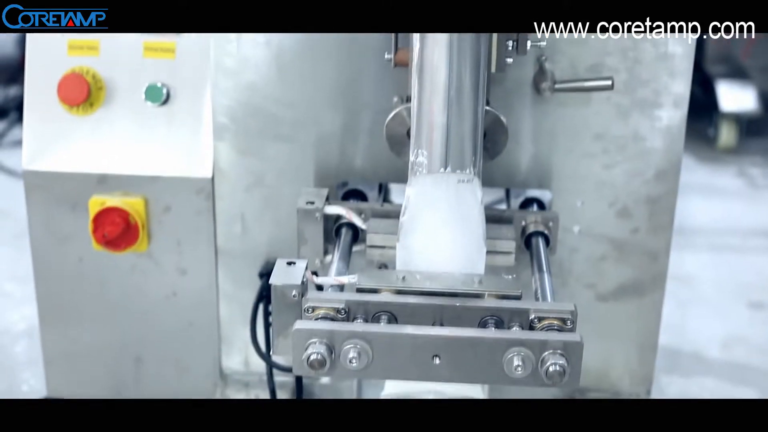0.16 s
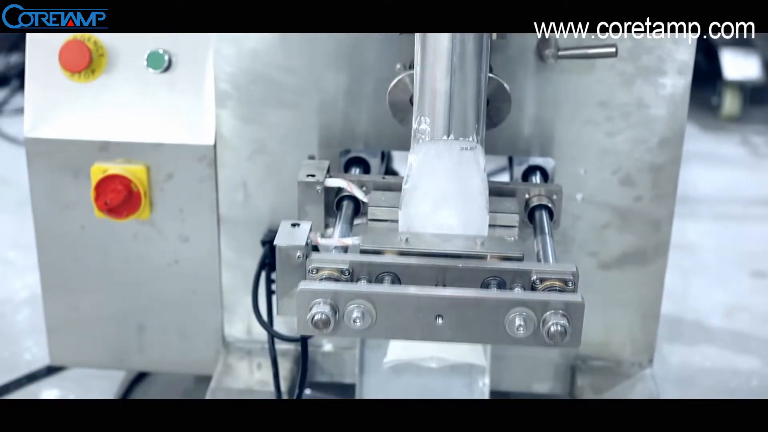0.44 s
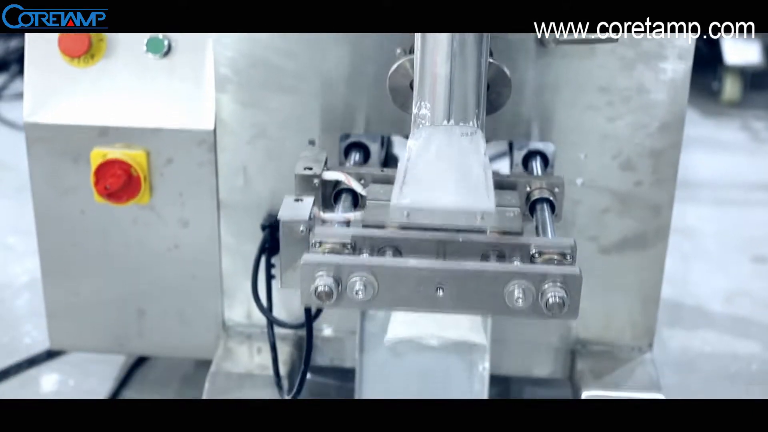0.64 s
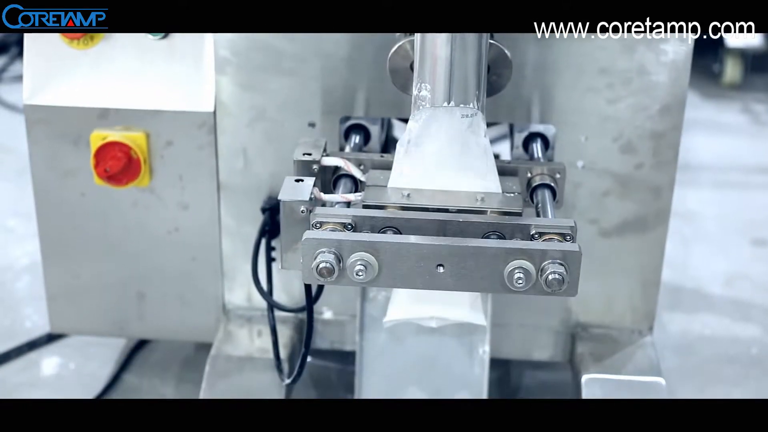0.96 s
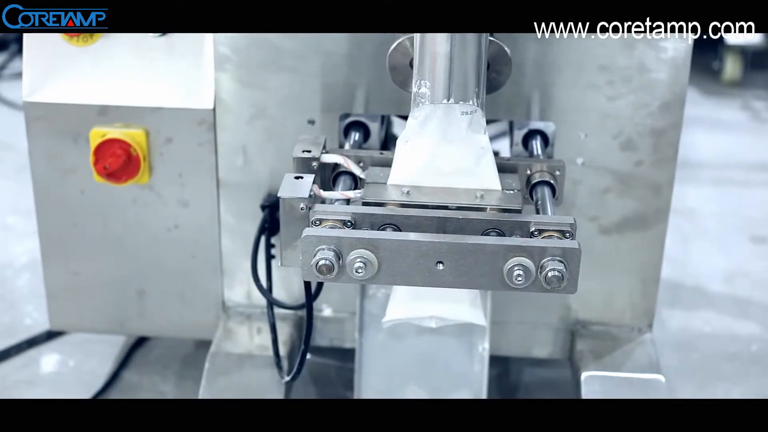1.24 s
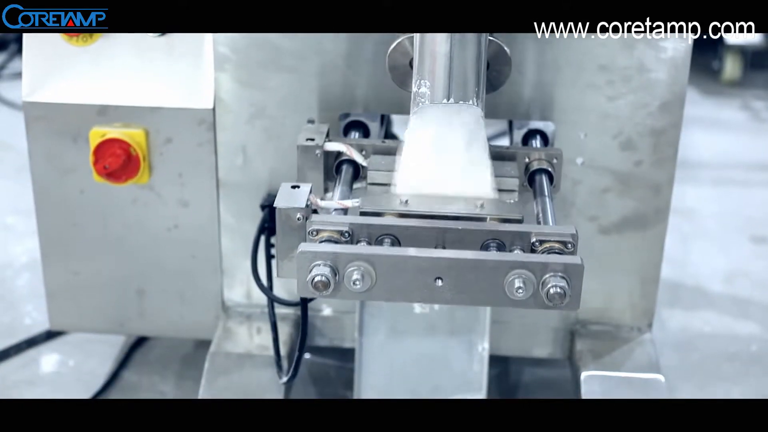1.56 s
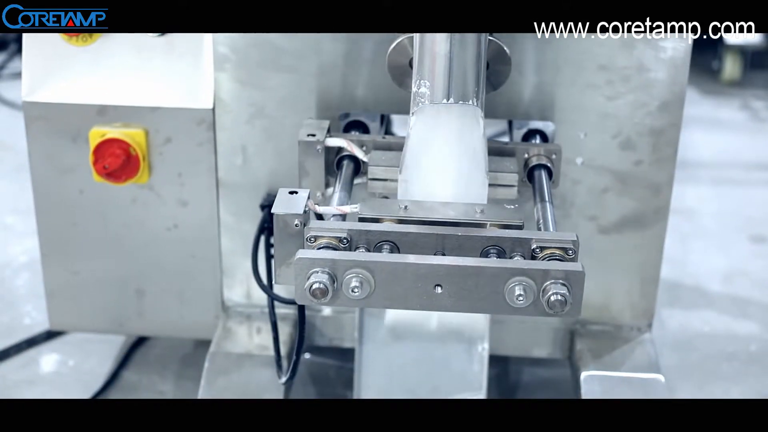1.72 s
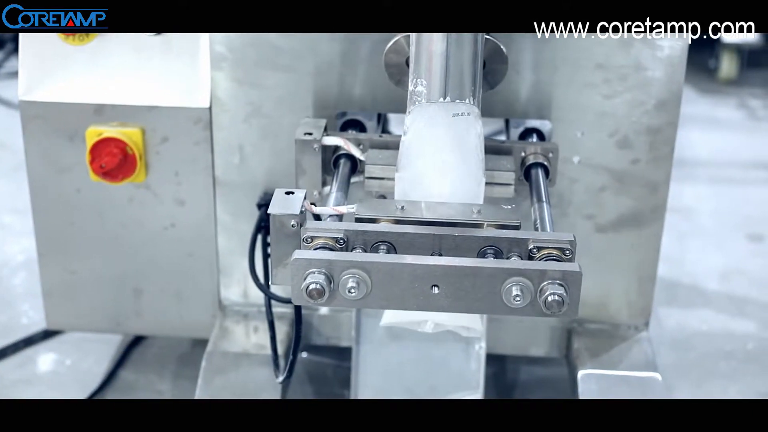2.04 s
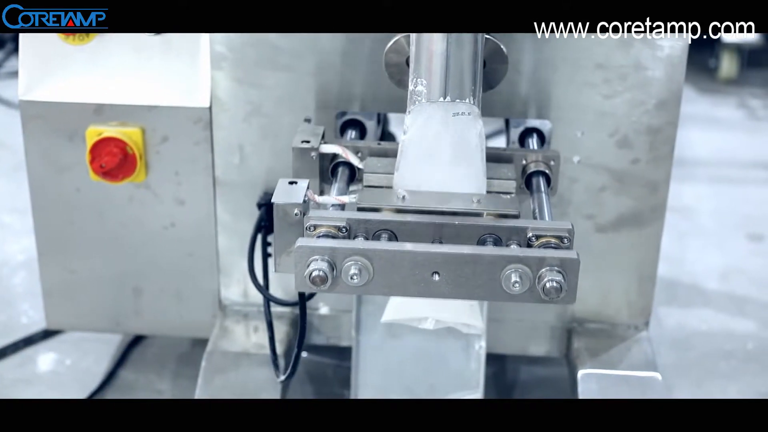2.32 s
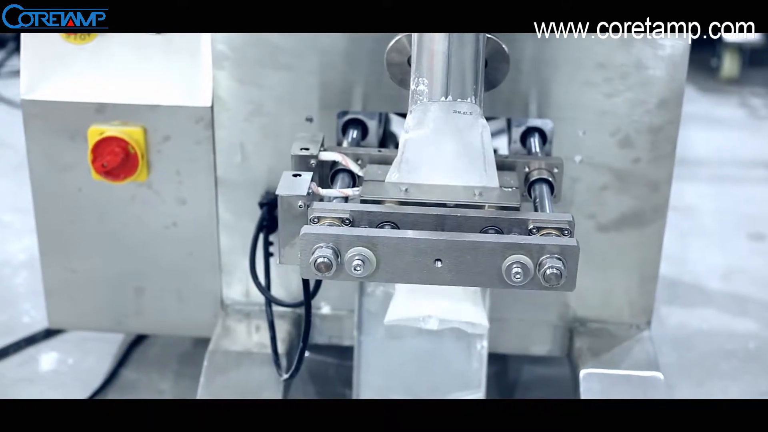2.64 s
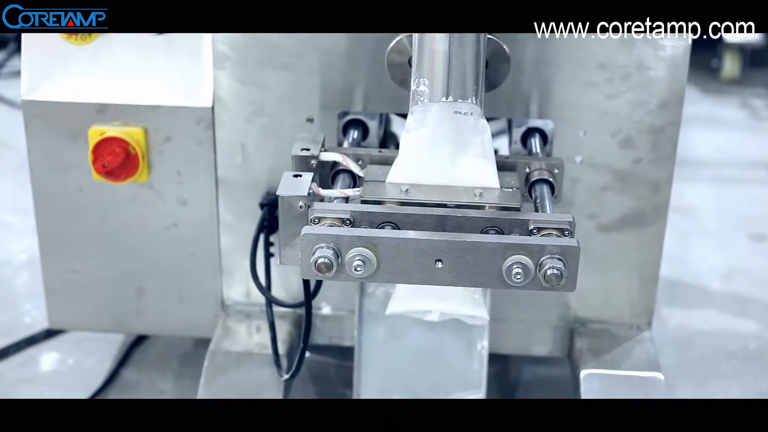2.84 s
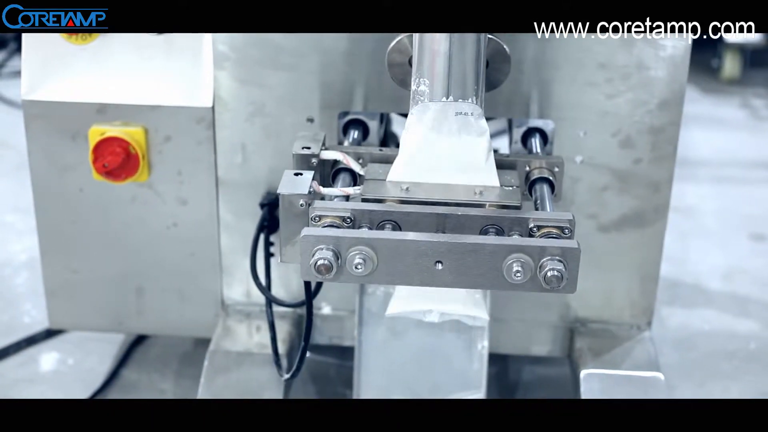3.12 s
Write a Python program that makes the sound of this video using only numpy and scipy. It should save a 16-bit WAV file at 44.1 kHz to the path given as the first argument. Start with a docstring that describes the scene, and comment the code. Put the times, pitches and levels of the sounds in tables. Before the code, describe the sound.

A packing machine hums and rumbles throughout, close, dull and mono. A run is already ending at 0 s, with a bump at 0.04. The drive climbs from 0.55 to 0.9, whines and rattles until 1.6, jaws thudding shut near 1.4 and film crinkling after, then stops with a bump at 1.8. It restarts at 2.3 with film rustling and faint squeaks from 2.4, jaws closing near 3.2.

```python
"""Bag packing machine, close

A bag packing machine cycles in a workshop, heard dull and close in mono over its own hum and rumble.
In each cycle the drive runs up, whines and rattles at full speed while the sealing jaws close with a thud,
then slows until the carriage bumps its stop. The plastic film rustles and squeaks faintly, amid small
snaps and faint ticks. Motor, gears and squeals are wavering tones, rumble and rattle are coloured noise
and clicks, and the knocks are decaying modes of the frame."""
import sys
import numpy as np
from scipy import signal
from scipy.fft import rfft, irfft
from scipy.io import wavfile

SR = 44100
rng = np.random.default_rng(int(sys.argv[2]) if len(sys.argv) > 2 else 0)


def file_out(sig):
    """Save sig as 16-bit WAV at sys.argv[1]."""
    # one column per channel
    cols = np.atleast_2d(sig).T
    # limit, then scale
    lim = np.clip(cols, -1, 1)
    pcm = np.round(lim * 32767).astype(np.int16)
    wavfile.write(sys.argv[1], SR, pcm)


N = 144648  # length of the scene [samples]

# Spectra are listed as (frequency [Hz], relative density [dB per Hz]); only their shape counts.

# rumble of the running machine: spectrum
RUMBLE_SPECTRUM = [(20, -16), (35, -8.5), (55, 0.5), (95, -2), (125, -2), (210, -7), (330, -5.5),
                   (450, -14.5), (600, -18.5), (900, -26), (1300, -36.5), (2000, -46.5), (2900, -49.5),
                   (3400, -68), (4100, -77.5), (14000, -86)]
RUMBLE_DB = -42
# motor and cabinet hum: (frequency [Hz], level [dB], waver [0-1])
HUM = [(68.4, -49.5, 0.9), (92.3, -47, .45), (137.4, -55.5, 0.3), (171.8, -51.5, .5), (337.4, -57.5, 0.1),
       (426.3, -65.5, .2), (485, -63.5, 0), (651, -69, 0.4), (900, -74.5, 0.7), (1098, -80.5, 0)]
# fine ticking of the running mechanism: spectrum
TICKING_SPECTRUM = [(500, -10), (1100, 5), (1900, -2), (2900, -12.5), (3500, -19.5), (4200, -40.5),
                    (8000, -67.5)]
TICKING_DB, TICKING_PER_S = -74.5, 280

# drive runs: (start [s], full speed [s], slowing [s], stopped [s], relative level [dB])
RUNS = [(-.81, -.51, -.15, .11, -.1), (.54, .915, 1.635, 1.9, -.5), (2.27, 2.71, 3.41, 3.68, -.2)]
# gear whine at full speed: (frequency [Hz], level before that of the run [dB])
WHINE = [(431.5, -53), (476, -59), (699.9, -51), (730, -57.5), (818.7, -55.5), (833, -59), (926, -66),
         (953, -68), (1416, -75), (1561, -79.5), (1685, -82), (1847, -79), (2143, -87)]
# rattle of the drive, also used for clacks and the rough part of the jaws: spectrum
RATTLE_SPECTRUM = [(20, -18), (45, -8), (68, 3), (110, -7), (170, -1), (260, 0), (440, -4.5), (590, -15),
                   (780, -18.5), (960, -15.5), (1100, -25), (1800, -30.5), (2100, -38.5), (2900, -43),
                   (3400, -47), (4200, -66), (5000, -82), (14000, -90)]
RATTLE_DB, GRIT_PER_S, GRIT_SHARE = -40, 330, 0.2  # grit: clicks, as a share of the rattle's power
SPEED_POWER, WHINE_POWER = 0.47, 7.4  # rattle and whine amplitude against relative speed
SHAFT_HZ, CHATTER_HZ = 29.7, 15.35  # rates at full speed
CHATTER_DEPTH, BUZZ_DEPTH = 0.23, 0.24

# film dragged over the forming tube: (time [s], relative level [dB])
PULL = [(.5, -38), (.65, -25), (.8, -13.5), (1.0, -30.5), (2.31, -36), (2.37, -8), (2.43, 3), (2.48, -1),
        (2.56, 0.5), (2.7, -0.5), (2.95, -13.5), (3.28, -30)]
# scrape of the dragged film: spectrum
FILM_SPECTRUM = [(100, -24.5), (300, 3), (480, 5.5), (660, 2), (850, -9.5), (1250, -9), (1600, -26.5),
                 (2500, -26.5), (3900, -30.5), (4700, -51), (7000, -69)]
FILM_DB = -52

# carriage bumps on its stop, and lighter knocks of the linkage: (time [s], relative level [dB])
KNOCKS = [(.014, -7.5), (.039, 6), (0.773, -2.5), (.902, -9), (0.987, -10.5), (1.124, -5), (1.546, -6.5),
          (1.589, -5), (1.646, -2.5), (1.686, -6), (1.808, -5), (1.822, 6), (2.491, -4), (2.532, -17),
          (2.585, 0.5), (2.869, -10), (3.026, -3), (3.09, -2)]
# modes of the machine frame: (frequency [Hz], relative level [dB], 60 dB decay time [s])
FRAME = [(174, -7.5, 0.24), (318, -6.5, 0.043), (346.3, 1, 0.074), (373, -8, 0.032), (517, -9.5, 0.036),
         (688, -19.5, 0.15), (819.5, -19.5, 0.035), (904, -25, .08)]
KNOCK_DB, KNOCK_RISE_S = -34.5, 0.01
CLACK_DB, CLACK_T60_S = -7, 0.056  # level relative to the knock

# small snaps and faint ticks, the one at 2.091 s a faint tick: (time [s], relative level [dB])
SNAPS = [(.036, -2.5), (1.551, -2), (1.61, 2), (1.729, -3), (1.811, -2.5), (2.091, -3), (2.175, -9)]
# one snap or tick: spectrum
SNAP_SPECTRUM = [(600, -22.5), (1800, 7.5), (3600, 6), (4600, -10), (6300, -20.5), (7500, -32),
                 (12000, -56)]
SNAP_DB, SNAP_T60_S = -64.5, 0.083

# cabinet panel booms: (time [s], length [s], frequency [Hz], peak level [dB])
BOOMS = [(0.522, 0.089, 101.7, -34), (1.093, 0.14, 70.9, -31.5), (1.46, 0.093, 71.3, -36.5),
         (1.74, 0.29, 68.9, -41.5), (2.082, 0.42, 73.6, -40.5), (3.077, 0.15, 69, -32)]
# the carriage rubs as it sets off: (start [s], length [s], frequency [Hz], level before the swell [dB])
RUBS = [(0.624, 0.085, 633, -51), (0.744, 0.061, 669, -50), (2.354, 0.043, 637, -44),
        (2.332, 0.15, 1262, -62.5), (2.499, 0.15, 340, -45.5), (2.522, 0.097, 650, -47)]
# the motor rasps at the end of each run-up: (start [s], level [dB])
RASPS = [(.864, -68.5), (2.647, -68)]
# housing resonances the rasp climbs through: (delay [s], length [s], frequency [Hz], relative level [dB])
HOUSING = [(0, .06, 2393, -3), (0.024, 0.07, 2730, -4)]

# thin whistle of the motor housing: (frequency [Hz], level before that of the run [dB])
WHISTLE = [(2978, -76.5), (2918, -87)]
WHISTLE_POWER, WHISTLE_LAG_S, WHISTLE_WAVER = 24, 0.034, 0.45

# jaws press shut: (time [s], length [s], start frequency [Hz], end frequency [Hz], level [dB])
PRESSES = [(1.408, .082, 206.4, 298.5, -33), (3.194, 0.068, 196.7, 317, -33.5),
           (3.237, 0.071, 244, 300, -33.5)]
# film crushed by the jaws: (start [s], length [s], relative level [dB])
CRUSHES = [(1.518, 0.1, -2.5), (1.59, 0.073, -4.5), (1.64, 0.15, -9.5)]
# crinkle of the crushed film: spectrum
CRINKLE_SPECTRUM = [(400, -33.5), (1200, 4.5), (1900, 3.5), (2800, -4), (4000, -11), (5300, -16.5),
                    (5800, -40.5), (10000, -68.5)]
CRINKLE_DB = -60
# faint squeal of the film: (start [s], length [s], frequency [Hz], level before the swell [dB])
SQUEALS = [(2.38, .2, 8236, -95), (2.59, .23, 8210, -85), (2.69, .38, 6803, -90), (2.7, .3, 13150, -91),
           (2.66, .24, 4380, -89)]

EDGE_HZ = 13400  # upper band limit of the recorder


def amp(db):
    """Decibels to gain."""
    return 10 ** (np.asarray(db) / 20)


def unit(x):
    """Scales to rms 1."""
    return x / np.sqrt(np.mean(x ** 2) + 1e-20)


def add(mix, s, sound):
    """Mixes a sound in at time s, cut at the end of the mix."""
    part = mix[max(round(s * SR), 0):][:len(sound)]
    part += sound[:len(part)]


def colour(x, points):
    """Filters x by a spectrum drawn over log frequency, at rms 1."""
    f, db = np.transpose(points)
    hz = np.fft.rfftfreq(len(x), 1 / SR)
    gain = amp(np.interp(np.log(hz + 1), np.log(f), db))
    return unit(irfft(rfft(x) * gain, len(x)))


def noise(size, points):
    """Steady hiss with the given spectrum, rms 1."""
    return colour(rng.standard_normal(size), points)


def drift(rate_hz):
    """Slow random wander, rms 1."""
    hz = np.fft.rfftfreq(N, 1 / SR)
    return unit(irfft(rfft(rng.standard_normal(N)) * np.exp(-(hz / rate_hz) ** 2), N))


def grains(per_s, spread_db):
    """Random clicks of uneven size and either sign, rms 1."""
    size = amp(spread_db * np.minimum(rng.exponential(1, N), 3)) * rng.choice([-1, 1], N)
    return unit(size * (rng.random(N) < per_s / SR))


def arch(length):
    """Time and a smooth swell that lasts for length."""
    t = np.arange(0, length, 1 / SR)
    return t, np.sin(np.pi * t / length)


def wavering(hz, waver, rate_hz, size):
    """A tone of about rms 1 whose level and phase wander; waver 0 is a clean sine."""
    wander = (drift(rate_hz) + 1j * drift(rate_hz)) / np.sqrt(2)
    sway = (1 + waver * wander) / np.sqrt(1 + waver ** 2)
    turns = hz * np.arange(size) / SR + rng.random()
    return np.sqrt(2) * (sway[:size] * np.exp(2j * np.pi * turns)).real


def run_speed(start, full, slowing, stopped):
    """Drive speed through one run, 1 at full speed, with straight ramps up and down."""
    return np.interp(np.arange(N) / SR, [start, full, slowing, stopped], [0, 1, 1, 0])


def idle():
    """The running machine: wavering hum lines over a rumble of coloured noise."""
    out = amp(RUMBLE_DB) * noise(N, RUMBLE_SPECTRUM)
    for hz, db, waver in HUM:
        out += amp(db) * wavering(hz, waver, rate_hz=7.7, size=N)
    return out


def ticking():
    """Fine random clicks of the mechanism, whose level wanders."""
    clicks = colour(grains(TICKING_PER_S, spread_db=-0.5), TICKING_SPECTRUM)
    return amp(TICKING_DB + 3.1 * drift(26)) * clicks


def drive():
    """Gears whine, buzz and chatter; pitch and level follow the speed of each run."""
    t, out = np.arange(N) / SR, np.zeros(N)
    for start, full, slowing, stopped, db in RUNS:
        speed = run_speed(start, full, slowing, stopped)
        travel = np.cumsum(speed) / SR  # in seconds at full speed
        travel -= np.interp(full, t, travel)
        beat = 1 + CHATTER_DEPTH * np.cos(2 * np.pi * CHATTER_HZ * travel)
        beat *= 1 + BUZZ_DEPTH * np.cos(2 * np.pi * 4 * SHAFT_HZ * travel)  # four per shaft turn
        hiss = np.sqrt(1 - GRIT_SHARE) * rng.standard_normal(N)
        grit = np.sqrt(GRIT_SHARE) * grains(GRIT_PER_S, spread_db=2.5)
        rattle = colour(hiss + grit, RATTLE_SPECTRUM)
        out += amp(RATTLE_DB + db) * speed ** SPEED_POWER * beat * rattle
        for hz, line_db in WHINE:
            phase = 2 * np.pi * (hz * travel + rng.random()) + 0.17 * drift(16)
            tone = np.sin(phase) * amp(1.5 * drift(26))
            out += amp(line_db + db) * np.sqrt(2) * speed ** WHINE_POWER * tone
    return out


def film_scrape():
    """Plastic film dragged over the tube: dense clicks that swell with the pull."""
    pull = amp(FILM_DB + np.interp(np.arange(N) / SR, *np.transpose(PULL)))
    return pull * colour(grains(4000, spread_db=0.5), FILM_SPECTRUM)


def knocks():
    """Each blow pushes the frame's decaying modes into ringing, with a short dull clack."""
    t, out = np.arange(SR // 3) / SR, np.zeros(N)
    free = np.maximum(t - KNOCK_RISE_S, 0)  # time since the push ended
    push = np.minimum(t / KNOCK_RISE_S, 1)
    for s, db in KNOCKS:
        ring = np.zeros(len(t))
        for hz, level, t60 in FRAME:
            mode_hz = hz * (1 + 0.0096 * rng.standard_normal())  # a little different in each blow
            ring += amp(level - 60 * free / t60) * np.sin(2 * np.pi * mode_hz * t)
        clack = noise(len(t), RATTLE_SPECTRUM) * amp(CLACK_DB - 60 * t / CLACK_T60_S)
        add(out, s, amp(KNOCK_DB + db) * push * (ring + clack))
    return out


def snaps_and_ticks():
    """Small snaps and faint ticks: coloured noise that starts at once and dies away."""
    t, out = np.arange(SR // 10) / SR, np.zeros(N)
    for s, db in SNAPS:
        decay = amp(SNAP_DB + db - 60 * t / SNAP_T60_S)
        add(out, s, decay * noise(len(t), SNAP_SPECTRUM))
    return out


def panel_booms():
    """The cabinet panels boom now and then: low sines that swell and fade."""
    out = np.zeros(N)
    for s, length, hz, db in BOOMS:
        t, swell = arch(length)
        add(out, s, amp(db) * swell * np.sin(2 * np.pi * hz * t))
    return out


def rubs():
    """Short scrapes from the sliding carriage: tones roughened by fast wavering."""
    out = np.zeros(N)
    for s, length, hz, db in RUBS:
        t, swell = arch(length)
        add(out, s, amp(db) * swell * wavering(hz, waver=1.6, rate_hz=63, size=len(t)))
    return out


def rasps():
    """The accelerating motor sets one housing resonance after the other ringing roughly."""
    out = np.zeros(N)
    for s, db in RASPS:
        for delay, length, hz, level in HOUSING:
            t, swell = arch(length)
            tone = wavering(hz, waver=0.91, rate_hz=39, size=len(t))
            add(out, s + delay, amp(db + level) * swell * tone)
    return out


def whistle():
    """The motor housing whistles near full speed, building and dying with a short lag."""
    out = np.zeros(N)
    keep = np.exp(-1 / (WHISTLE_LAG_S * SR))
    for *times, db in RUNS:
        ringing = signal.lfilter([1 - keep], [1, -keep], run_speed(*times) ** WHISTLE_POWER)
        for hz, line_db in WHISTLE:
            out += amp(line_db + db) * ringing * wavering(hz, WHISTLE_WAVER, rate_hz=14, size=N)
    return out


def jaws():
    """The jaws close with a short groan: a rising tone with rough noise."""
    out = np.zeros(N)
    for s, length, start_hz, end_hz, db in PRESSES:
        t, swell = arch(length)
        turns = np.cumsum(start_hz + (end_hz - start_hz) * t / length) / SR
        groan = np.sin(2 * np.pi * turns) + 0.43 * noise(len(t), RATTLE_SPECTRUM)
        add(out, s, amp(db) * swell * groan)
    return out


def film_crinkle():
    """Film crushed in the jaws: dense uneven clicks, heard only while it is gripped."""
    crinkle = colour(grains(5000, spread_db=1.5), CRINKLE_SPECTRUM) * amp(1.8 * drift(55))
    grip = np.zeros(N)
    for s, length, db in CRUSHES:
        add(grip, s, amp(CRINKLE_DB + db) * arch(length)[1])
    return grip * crinkle


def film_squeals():
    """The film squeals faintly: high, unsteady tones that swell and fade."""
    out = np.zeros(N)
    for s, length, hz, db in SQUEALS:
        t, swell = arch(length)
        add(out, s, amp(db) * swell * wavering(hz, waver=1.4, rate_hz=27, size=len(t)))
    return out


def scene():
    """The whole machine, in mono."""
    machine = idle() + ticking() + drive() + rasps() + whistle()
    blows = knocks() + snaps_and_ticks() + panel_booms() + rubs() + jaws()
    film = film_scrape() + film_crinkle() + film_squeals()
    return (machine + blows + film)[None]


def record(dry):
    """The recorder's band limit: a steep low-pass."""
    low_pass = signal.firwin(511, EDGE_HZ, window=("kaiser", 9), fs=SR)
    return signal.oaconvolve(dry, low_pass[None], "same")


dry = scene()
out = record(dry)
file_out(out)
```